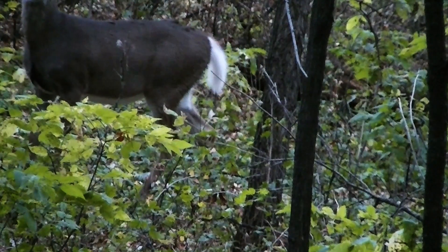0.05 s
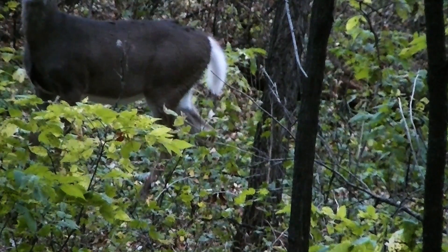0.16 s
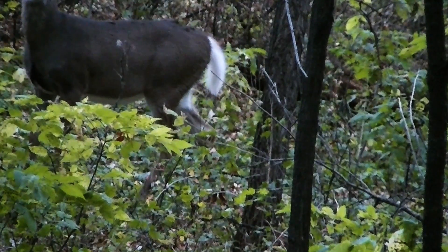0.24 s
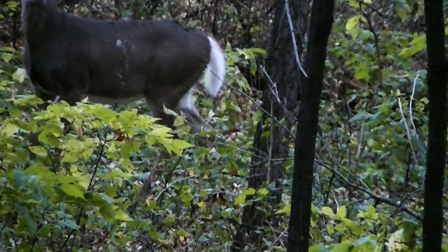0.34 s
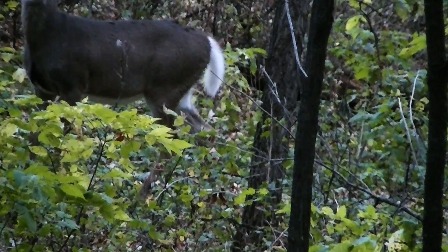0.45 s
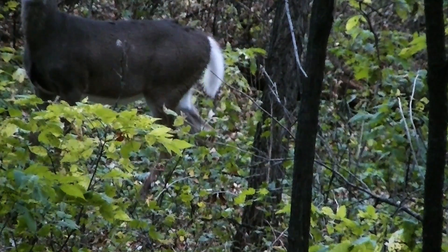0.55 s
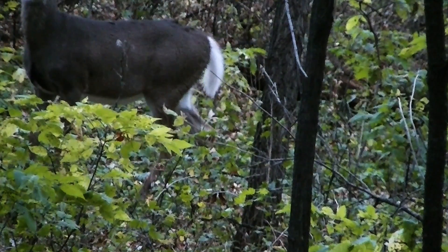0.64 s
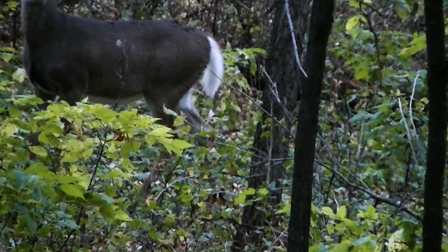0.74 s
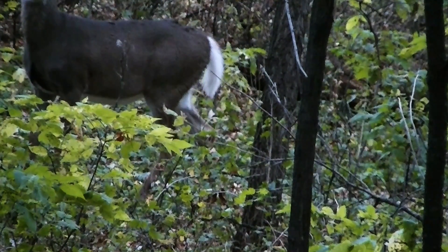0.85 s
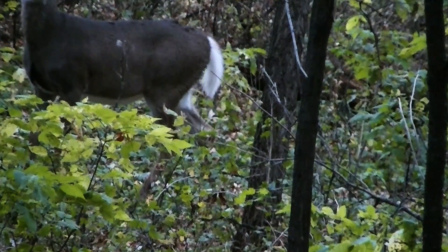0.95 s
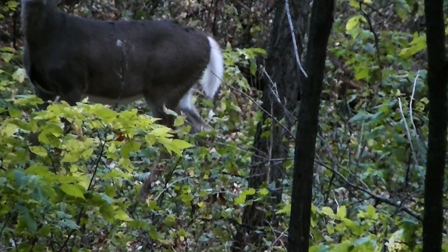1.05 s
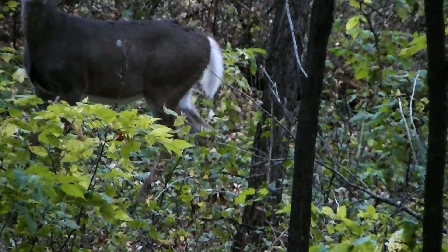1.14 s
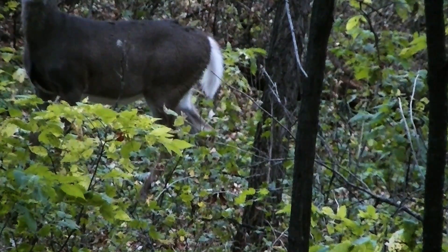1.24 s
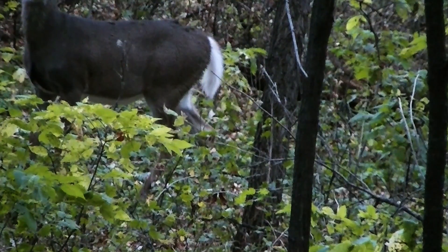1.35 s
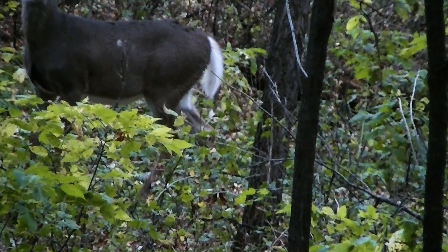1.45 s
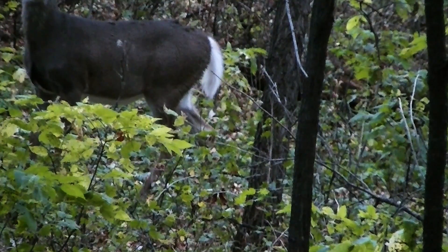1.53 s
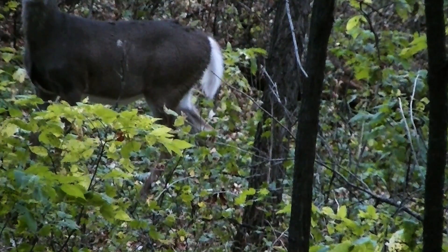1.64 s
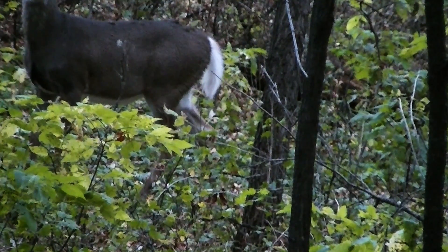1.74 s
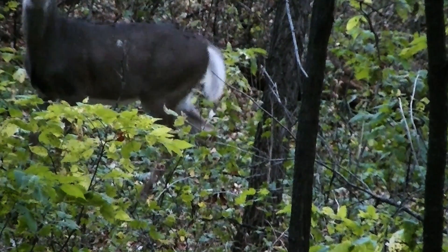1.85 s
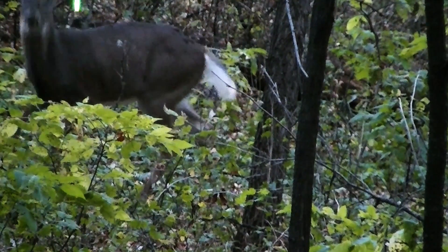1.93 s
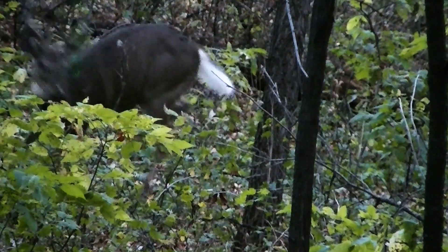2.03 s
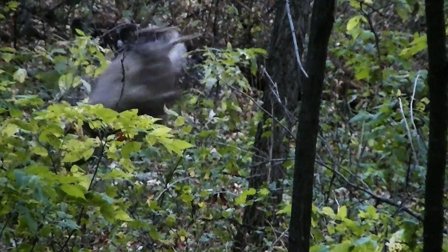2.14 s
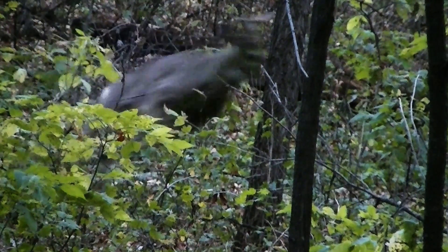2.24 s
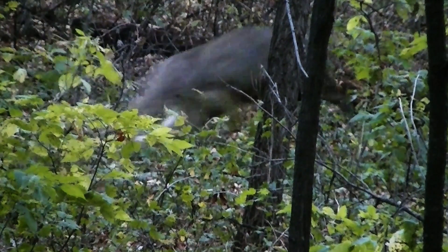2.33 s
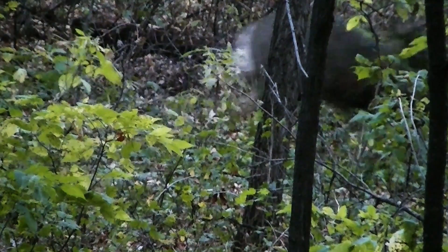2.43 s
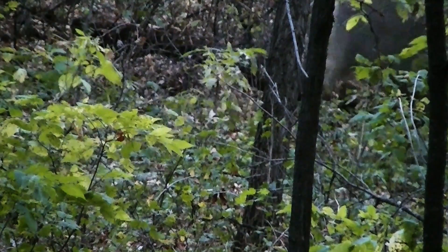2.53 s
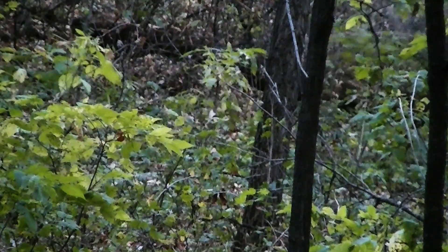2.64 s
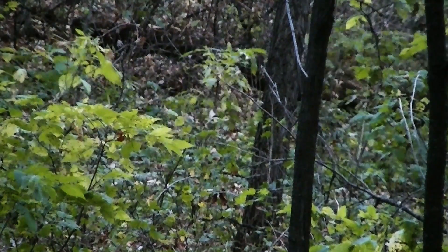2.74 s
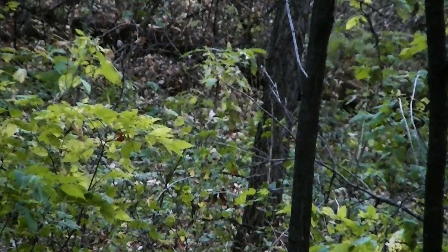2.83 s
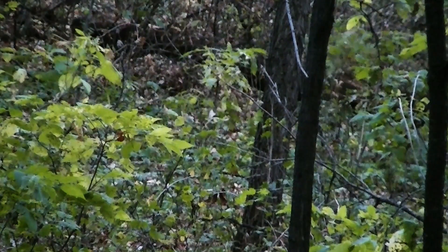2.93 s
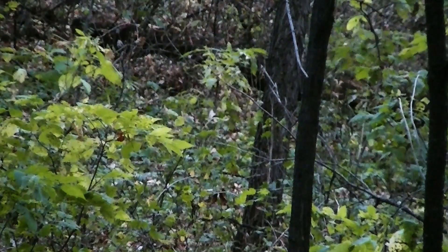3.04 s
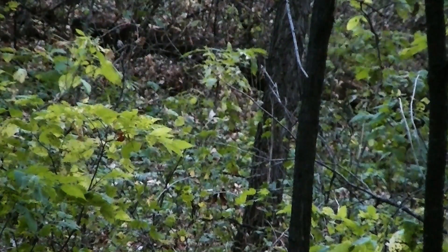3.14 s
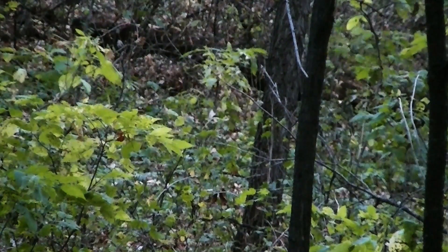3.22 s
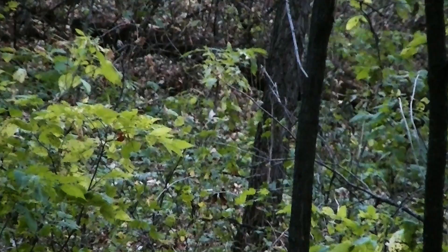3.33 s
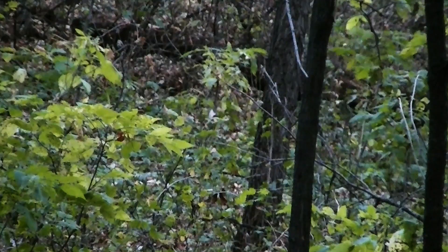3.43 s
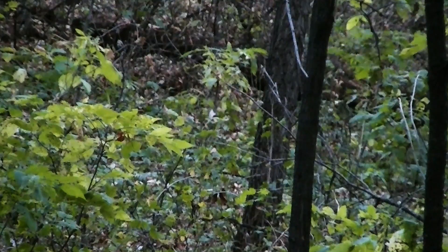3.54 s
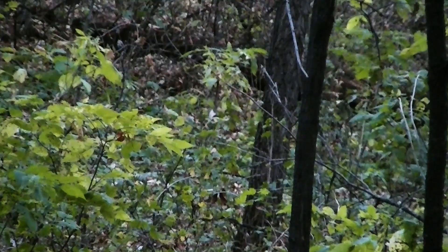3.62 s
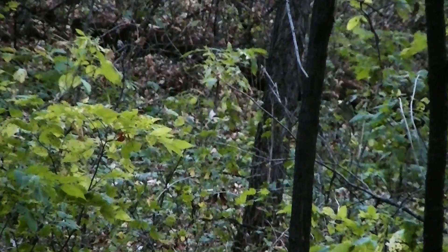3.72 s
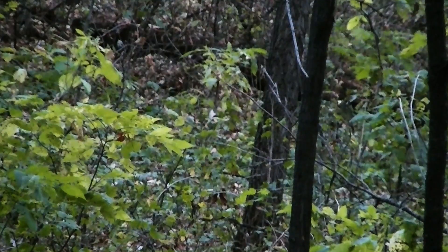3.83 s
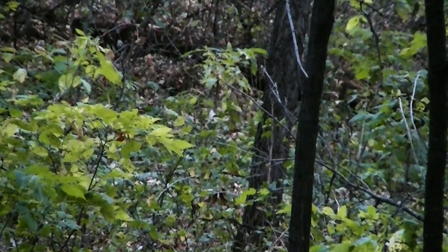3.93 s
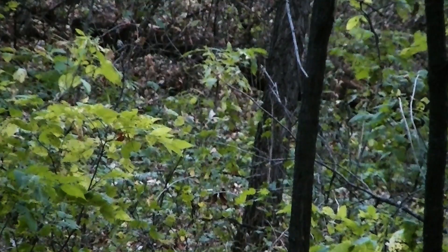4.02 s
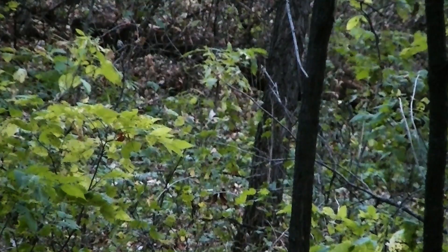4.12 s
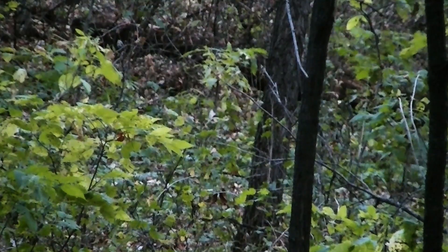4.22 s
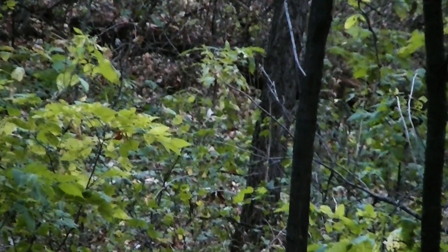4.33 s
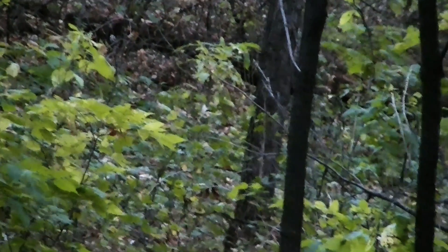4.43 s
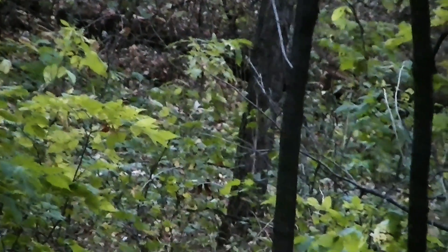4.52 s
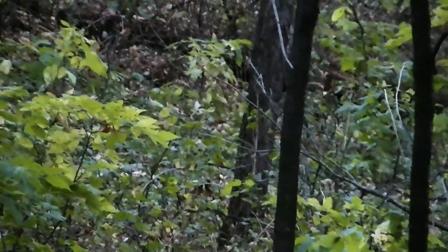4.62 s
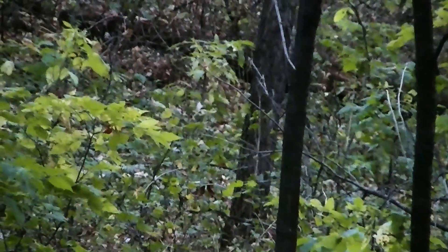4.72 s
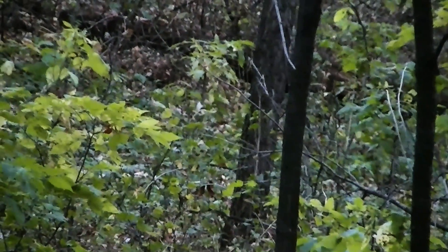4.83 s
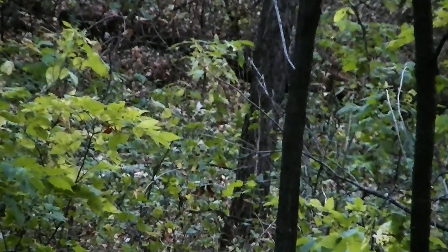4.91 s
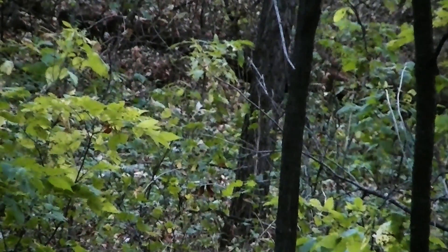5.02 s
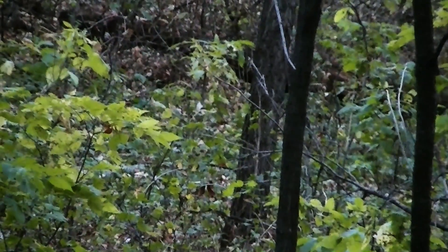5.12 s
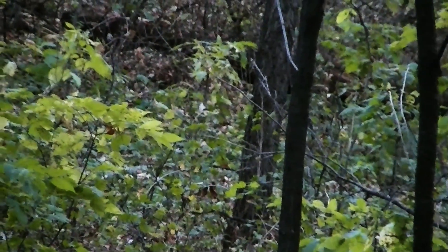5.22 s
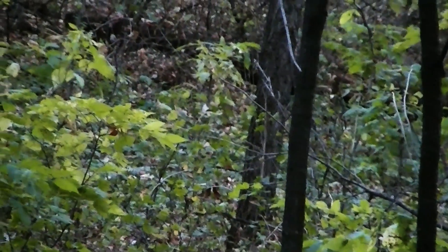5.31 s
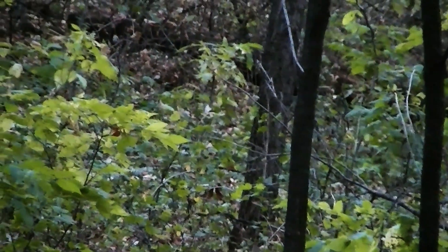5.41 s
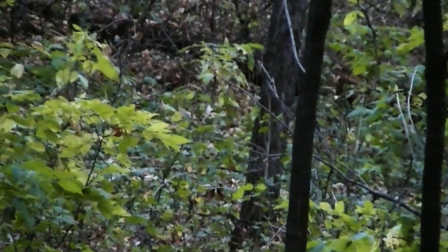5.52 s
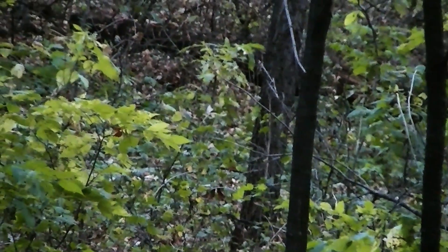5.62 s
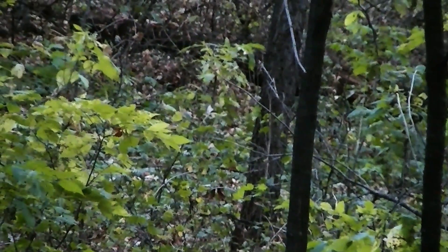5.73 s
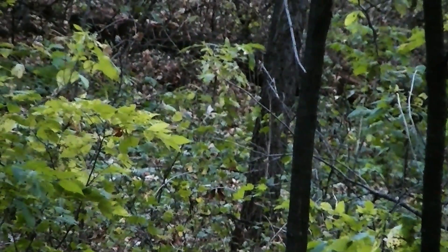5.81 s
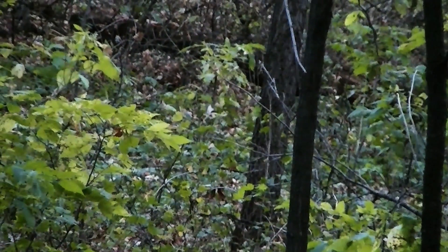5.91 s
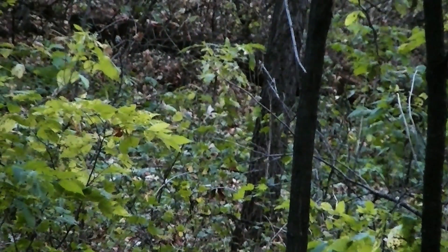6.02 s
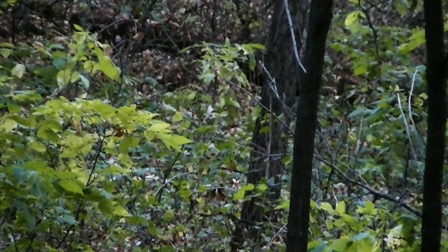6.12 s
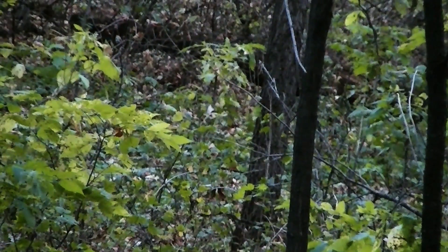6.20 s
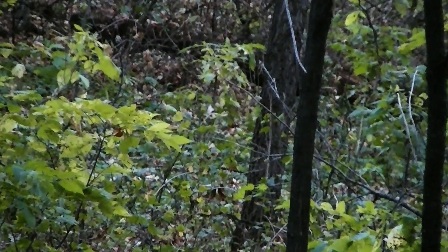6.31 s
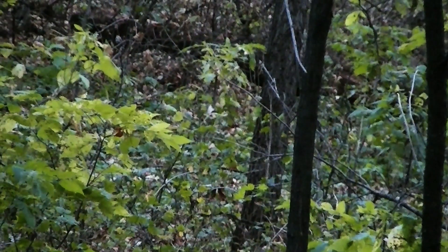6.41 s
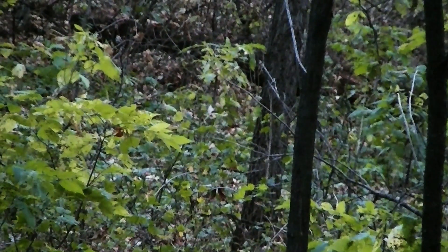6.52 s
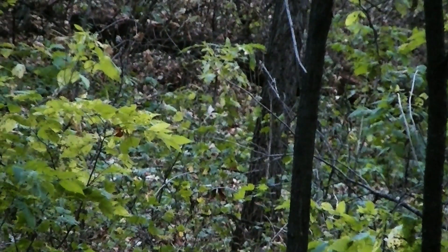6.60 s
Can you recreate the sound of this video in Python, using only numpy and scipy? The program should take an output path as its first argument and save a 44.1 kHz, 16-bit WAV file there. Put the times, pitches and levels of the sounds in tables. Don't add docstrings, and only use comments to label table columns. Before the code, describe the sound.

Quiet woodland air, then a bow fires right beside the microphone with a click, a rattling string slap loud enough to distort, and shaking limbs. A short hiss ends in a sharp smack as the arrow hits a deer, tearing hide and echoing off trees. The deer bolts, crunching dry leaves and snapping twigs, while a faint animal calls far off.

```python
import sys
import numpy as np
from scipy import signal
from scipy.fft import rfft, irfft, next_fast_len
from scipy.io import wavfile
from scipy.ndimage import map_coordinates

SR = 44100
rng = np.random.default_rng(int(sys.argv[2]) if len(sys.argv) > 2 else 0)


def elevation(decibels):
    levels = np.asarray(decibels, float)
    return 10 ** (levels / 20)


def bounce(signal):
    frames = np.transpose(np.atleast_2d(signal))
    limited = np.clip(frames, -1, 1)
    pcm = np.round(limited * 32767).astype(np.int16)
    wavfile.write(sys.argv[1], SR, pcm)


N = 293660

# (frequency [Hz], level [dB])
AIR_COLOUR = [(20, -36), (70, -23), (100, -20), (150, -9.5), (240, -6.5), (310, -3), (850, -2), (1460, -10),
              (3100, -11.5), (8000, -15), (15600, -22.5)]
# (frequency [Hz], likeness [0-1])
AIR_ALIKE = [(60, 0.65), (200, 0.97), (700, 0.79), (1800, 0.38), (4400, 0.69), (8000, 0.82), (15000, 0.94)]
# (time [s], pitch [Hz], level [dB])
CALL_NOTES = [
    [(4.2, 419, -52), (4.25, 414, -45), (4.37, 373, -43), (4.5, 317, -51), (4.55, 323, -76)],
    [(6.28, 406, -75.5), (6.33, 386.3, -53), (6.45, 421, -45.5), (6.55, 366, -52), (6.66, 384, -59)],
]
# (frequency [Hz], time to die by 60 dB [s])
TREE_ECHO = [(200, 1), (2000, 0.48), (10000, 0.39)]

# (frequency [Hz], level [dB])
LEAF_COLOUR = [(88, -41), (150, -20.5), (346, -9.5), (445, -7), (481, -2.5), (668, -3), (1480, -1),
               (1830, -0.5), (3100, 2.5), (5230, 6), (6350, 2), (7270, -5.5), (8490, 0), (10100, -1.5),
               (15500, -19.5)]
# (frequency [Hz], likeness [0-1])
LEAF_ALIKE = [(200, 1), (2000, 1), (8000, 0.94), (15000, 0.96)]
# (time [s], level [dB], time to die by 60 dB [s], weight [dB], dryness [dB])
LANDINGS = [(2.114, -24, 0.71, 1, -12), (2.211, -25, 0.48, -2, -2.5), (2.372, -33.5, .8, 7, 1),
            (2.844, -27, 1.02, -5, -2), (3.119, -30, 0.75, 4, -4), (3.648, -27, 0.79, -6, -2),
            (3.936, -38.5, 1.6, 6.5, -4.5), (4.068, -31, 1.45, 2, -13), (4.407, -27.5, 0.35, -3, 8.5),
            (4.488, -31, 0.32, 0, 8), (4.716, -26.5, 0.17, 4.5, 4.5), (5.07, -34.5, 1.7, -5.5, 5),
            (5.607, -38, 0.51, 16.5, -3), (5.63, -31, 0.82, 0.5, -4), (6.484, -44, 2.1, 6.5, -5.5)]
# (middle [s], level
# [dB], half-length [s], weight [dB], dryness [dB])
SWEEPS = [(2.536, -41, 0.087, -2, 4), (2.55, -53, .16, 14, 0), (2.704, -43, 0.052, 2.5, 10),
          (2.81, -31, 0.037, -6.5, 2.5), (3.04, -36, 0.056, 7, -1), (3.308, -31.5, 0.16, -1.5, -1.5),
          (3.447, -32.5, 0.053, -5, -3), (3.59, -33, 0.084, -1.5, 0.5), (3.803, -42, .06, 9.5, -1),
          (3.9, -41, .06, 0, 1), (4.118, -35, 0.025, 8.5, 3.5), (4.227, -36.5, 0.033, 0.5, 1),
          (4.388, -34, 0.018, 0, 2.5), (4.537, -25, 0.029, -2, -3), (4.633, -31, 0.044, -0.5, 0),
          (4.794, -40.5, 0.03, -3, 2), (4.909, -39, 0.076, -4, 4), (5.118, -39, 0.05, -16, 9),
          (5.287, -28.5, 0.02, -3, 2), (5.435, -35.5, 0.19, 0.5, -1.5), (5.743, -34.5, 0.089, -3, -2),
          (5.858, -36, 0.068, -5.5, -5), (5.964, -36.5, 0.049, -7.5, -5), (6.06, -42, .1, -1, -9),
          (4.3, -45.5, 2.5, 7, -6.5)]
# (level [dB], share of weight [0-1], share of dryness [0-1])
LEAF_PARTS = [
    (0, 0, 0.026),
    (-10, 0.8, 0.19),
    (-5, 0.59, 0),
    (-6, 0.17, 1),
]

# (time [s], peak level [dB], lowest frequency [Hz], highest frequency [Hz])
TWIG_SNAPS = [(.6697, -22, 1800, 6800), (2.2160, -11, 2500, 6500), (2.3738, -5, 1500, 6500),
              (2.6872, -24, 7800, 13000), (2.8460, -19, 2500, 6500), (3.0200, -19, 1000, 4000),
              (3.1205, -9, 2000, 4400), (3.1500, -1, 1900, 6500), (3.5490, -16, 3000, 7000),
              (3.6604, -10, 3000, 6800), (3.9380, -20, 1800, 3400), (3.9470, -19, 1200, 3000),
              (4.0682, -21, 2500, 7000), (4.1085, -13, 1300, 5000), (4.4120, -14, 3500, 7000),
              (4.4222, -11, 3200, 6800), (4.4897, -4, 1800, 6800), (4.5035, -15, 3000, 8000),
              (4.5210, -12, 4000, 6800), (4.5555, -9, 1200, 6500), (4.6150, -16, 1200, 5500),
              (4.6275, -16, 3500, 6800), (4.6340, -16, 6000, 11000), (4.6600, -7, 4500, 9500),
              (4.7183, -9, 1500, 6500), (4.9782, -22, 6500, 11000), (5.1405, -12, 3500, 10500),
              (5.2778, -15, 3000, 6500), (5.2912, -8, 6500, 11000), (5.8650, -20, 3500, 6800)]
# (time [s], level [dB], pitch [Hz])
KNOCKS = [(2.214, -17, 900), (2.3724, -18, 770), (3.019, -23, 1060), (3.1215, -22, 1450),
          (3.1503, -18, 863), (3.151, -20, 450), (3.198, -15, 1480), (3.659, -28, 1090), (3.657, -27, 453),
          (3.938, -24, 2112), (4.109, -22, 300), (4.110, -18, 1540), (4.489, -11.5, 956),
          (4.521, -24, 1900), (4.557, -14.5, 2100), (5.608, -24, 1460), (5.609, -28, 493),
          (6.486, -42, 520)]
# (time [s], level [dB], pitch [Hz], length [s])
SINGING_BRANCH = (4.721, -25, 1850, .09)
# (start [s], end [s])
DEER_TURNS_S = (4.2, 4.7)

# (time [s], level [dB])
FLIGHT = [(2.0, -40), (2.05, -38), (2.053, -24), (2.075, -27), (2.094, -26), (2.11, -40), (2.12, -90)]
# (frequency [Hz], level [dB])
VANE_COLOUR = [(350, -44), (600, -16), (966, -24), (1090, -26), (1960, -8.5), (5360, 3.5), (7430, -10),
               (8630, -2), (15500, -33)]
# (time [s], level [dB], time to die by 60 dB [s])
SMACK = [
    (2.0956, 8, 0.02),
    (2.0975, 4, 0.015),
    (2.1005, -9, 0.28),
    (2.113, -8, 0.043),
    (2.119, -18, 0.063),
    (2.149, -18, 0.11),
]
# (frequency [Hz], level [dB])
HIDE_COLOUR = [(60, -50), (160, -36), (400, -12), (900, 1.5), (1500, -1.5), (2500, -5), (4300, 5),
               (5800, 1), (7300, -20), (9700, -9), (15500, -33)]
# (pitch [Hz], level [dB], time to die by 60 dB [s])
CHEST_NOTES = [(452, -11, 0.022), (914, 1, 0.018), (1450, 1.5, 0.017), (2260, 2, 0.023), (2806, 8, 0.015),
               (4200, 1, 0.024), (4880, 0, 0.021)]

SLAP_TIMES_S = [1.6348, 1.6425, 1.6495, 1.6532, 1.6580, 1.6622, 1.6691, 1.6774, 1.6868, 1.6957, 1.7040,
                1.7143, 1.7342]
# (ring level [dB], crack level [dB])
SLAP_LEVELS = [(-1, -6), (-10, -3), (-16, 11), (5, 9), (1, 0), (-19, 8.5), (2.5, 2), (7, 13), (6, 1),
               (5, 7), (11, 7), (1, -20), (-8, -28)]
# (time [s], level [dB])
THUMPS = [
    (1.658, -10),
    (1.6622, 2),
    (1.6691, -23),
    (1.6774, -22),
]
# (time [s], level [dB], time to die by 60 dB [s])
JOLTS = [
    (1.6355, -4, .075),
    (1.6495, -3, .16),
]
# (time [s], level [dB])
SHUDDER = [(1.65, -25), (1.68, -11), (1.71, -11), (1.72, -18), (1.76, -24), (1.82, -31.5), (2.0, -39.5),
           (2.4, -43.5), (3.0, -80)]
# (frequency [Hz], level [dB])
LIMB_COLOUR = [(60, -53), (200, -12), (450, -9), (1000, -7.5), (2150, -6), (3200, -3.5), (4500, -4.5),
               (7370, -14), (9500, -12.5), (12500, -20.5), (15500, -25)]
# (frequency [Hz], level [dB])
CRACK_COLOUR = [(200, -51), (1000, -7), (2500, 12), (5000, -33), (7200, 0.5), (9500, 7), (12500, -1),
                (15500, -31)]
# (frequency [Hz], likeness [0-1])
BOW_ALIKE = [(60, 0.94), (500, 1), (3000, 0.99), (15000, 0.98)]


def unit(x):
    return x / np.sqrt(np.mean(x ** 2) + 1e-20)


def along(points, hz):
    f, v = np.transpose(points)
    return np.interp(np.log(hz + 1), np.log(f + 1), v)


def curves(rows):
    s, *cols = np.transpose(rows)
    return [np.interp(np.arange(N) / SR, s, c) for c in cols]


def wobble(rate):
    knots = rng.standard_normal(int(N * rate / SR) + 4)
    return map_coordinates(knots, [np.arange(N) * rate / SR])


def filtered(x, response):
    m = next_fast_len(N + 8192)
    return irfft(rfft(x, m) * response(np.fft.rfftfreq(m, 1 / SR)), m)[..., :N]


def band(lo_hz, hi_hz):
    return lambda hz: 1 / np.sqrt((1 + (lo_hz / (hz + 1)) ** 8) * (1 + (hz / hi_hz) ** 8))


def hiss(colour):
    return unit(filtered(rng.standard_normal(N), lambda hz: elevation(along(colour, hz))))


def rush(colour, alike, grain=1):
    def middle_and_side(hz):
        turn = np.arccos(np.clip(along(alike, hz), -1, 1)) / 2
        return elevation(along(colour, hz)) * np.array([np.cos(turn), np.sin(turn)])

    mid, side = filtered(grain * rng.standard_normal((2, N)), middle_and_side)
    return unit(np.array([mid + side, mid - side]))


def dying(rows):
    power, t = np.zeros(N + SR), np.arange(SR // 2) / SR
    for s, db, t60 in rows:
        power[round(s * SR):][:len(t)] += elevation(2 * (db - 60 * t / t60))
    return np.sqrt(power[:N])


def ring(s, db, hz, t60, turns, order=1):
    out, t = np.zeros(N + SR), np.arange(SR // 8) / SR
    swell = 1 - np.exp(-t * hz / turns)
    fade = elevation(db - 60 * (t / t60) ** order)
    out[round(s * SR):][:len(t)] = fade * np.sin(2 * np.pi * hz * t) * swell
    return out[:N]


def snaps(rows, t60):
    out, t = np.zeros(N + SR), np.arange(SR // 20) / SR
    for (s, db, *edges), noise in zip(rows, rng.standard_normal((len(rows), len(t)))):
        noise = np.r_[4, noise[1:]]
        sos = signal.butter(2, edges, "band", fs=SR, output="sos")
        burst = signal.sosfilt(sos, noise * elevation(-60 * t / t60))
        out[round(s * SR):][:len(t)] += elevation(db) * burst / np.abs(burst).max()
    return out[:N]


def air():
    drift_db = 0.4 * wobble(3)
    return elevation(-44 + drift_db) * rush(AIR_COLOUR, AIR_ALIKE)


def far_call():
    voice = np.zeros(N)
    for rows in CALL_NOTES:
        hz, db = curves(rows)
        hz = hz * (1 + 0.07 * wobble(50))
        calling = db > rows[0][2]
        voice += calling * elevation(db + 3.5 * wobble(60)) * np.sin(2 * np.pi * np.cumsum(hz) / SR)
    return voice


def trees(x):
    hz, t, z = signal.stft(rng.standard_normal((2, SR // 2)), SR, nperseg=256)
    tail = signal.istft(z * elevation(-60 * t / along(TREE_ECHO, hz)[:, None]), SR, nperseg=256)[1]
    tail = tail[0] + 0.12 * tail[1] * np.array([[1], [-1]])
    late = np.pad(x, (300, 0))[None]
    return signal.fftconvolve(late, tail / np.linalg.norm(tail[0]), axes=1)[:, :N]


def leaves():
    t = np.arange(N) / SR
    crackle_db = 2.8 * np.minimum(rng.exponential(size=N), 3.5)
    clump_db = 1.0 * wobble(250) + 0.63 * wobble(40)
    litter = rush(LEAF_COLOUR, LEAF_ALIKE, elevation(crackle_db + clump_db))

    land_s, _, land_t60, *_ = np.transpose(LANDINGS)
    since = np.maximum(t - land_s[:, None], 0)
    rise = 1 - np.exp(-since / 0.0032)
    landings = (rise * elevation(-60 * since / land_t60[:, None])) ** 2
    sweeps = [np.exp(-((t - s) / half) ** 2) for s, _, half, *_ in SWEEPS]
    powers = np.array([*landings, *sweeps])

    _, db, _, weight, dryness = np.transpose(LANDINGS + SWEEPS)
    edges = [(3200, 7300), (100, 1400), (1400, 3200), (7300, 18000)]  # Hz, one pair a part
    total = 0
    for (part_db, heavy, dry_share), pair in zip(LEAF_PARTS, edges):
        gain = np.sqrt(elevation(2 * (db + part_db + heavy * weight + dry_share * dryness)) @ powers)
        total = total + gain * elevation(1.23 * wobble(30)) * unit(filtered(litter, band(*pair)))
    return (since[0] > 0) * total


def twigs():
    brittle_hz = 4800
    splinters = [(s, db - 13, 7800, 11500) for s, db, _, top in TWIG_SNAPS if top > brittle_hz]
    crack = snaps(TWIG_SNAPS + splinters, t60=0.011)
    thud = snaps([(s, db - 1, 0.5 * hz, 2.8 * hz) for s, db, hz in KNOCKS], t60=0.019)
    wood = sum(ring(*row, 0.024, turns=0.36) for row in KNOCKS)
    branch = ring(*SINGING_BRANCH, turns=2.3, order=3)
    return crack + thud, wood + branch


def arrow():
    flying = np.arange(N) > FLIGHT[0][0] * SR
    flight = flying * elevation(curves(FLIGHT)[0] + 1.8 * wobble(130)) * hiss(VANE_COLOUR)
    chest = sum(ring(SMACK[0][0], db, hz, t60, turns=0.32) for hz, db, t60 in CHEST_NOTES)
    tearing = dying(SMACK) * elevation(-4.5 + 1.5 * wobble(610)) * hiss(HIDE_COLOUR)
    return chest, flight + tearing


def bow():
    lean_db = 0.6 * rng.standard_normal((len(SLAP_LEVELS), 1, 1)) * [[1], [-1]]
    s = np.array(SLAP_TIMES_S)

    release_hz, release_ends_s = 2230, 1.651
    riser_hz = 3130 * (1 + 0.07 * np.exp((release_ends_s - s) / 0.012))
    notes_hz = np.where(s < release_ends_s, release_hz, riser_hz)
    riser = 0
    for at, hz, pan_db, (db, _) in zip(s, notes_hz, lean_db, SLAP_LEVELS):
        riser = riser + elevation(pan_db) * ring(at, db, hz, 0.0066, turns=0.81, order=3)

    thump = sum(ring(*row, 800, 0.0083, turns=0.32) for row in THUMPS)
    crack_rows = [(at - 0.0004, db - 5, 0.012) for at, (_, db) in zip(s, SLAP_LEVELS)]
    crack = dying(crack_rows) * rush(CRACK_COLOUR, BOW_ALIKE)
    shaking = (np.arange(N) > SHUDDER[0][0] * SR) * elevation(curves(SHUDDER)[0])
    shake = np.hypot(dying(JOLTS), shaking)
    limbs = shake * elevation(0.5 * wobble(390)) * rush(LIMB_COLOUR, BOW_ALIKE)
    return riser, thump + crack + limbs


def treble_notch(hz):
    return elevation(-4 * np.exp(-((hz - 7400) / 330) ** 2))


def scene():
    (riser, shot), (cracks, wood), (chest, hit) = bow(), twigs(), arrow()
    to_trees = elevation(-25) * shot[0] + elevation(-7.0) * hit + elevation(-16.0) * cracks
    echo = filtered(trees(to_trees), band(180, 17000))
    no_bass = signal.butter(2, 290, "high", fs=SR, output="sos")
    far = signal.sosfilt(no_bass, chest + hit + cracks + wood)
    deer = far + echo + leaves()
    ahead = np.interp(np.arange(N) / SR, DEER_TURNS_S, (1, 0))
    deer = ahead * filtered(deer, treble_notch) + (1 - ahead) * deer
    return riser + shot + deer + far_call() + air()


def top_cut(x):
    return signal.sosfilt(signal.butter(12, 15730, fs=SR, output="sos"), x)


def record(dry):
    top = 0.99
    return top_cut(np.clip(dry, -top, top))


dry = scene()
out = record(dry)
bounce(out)
```